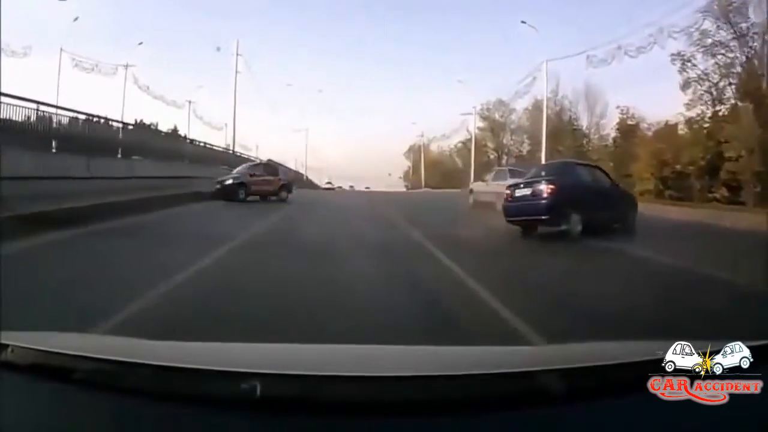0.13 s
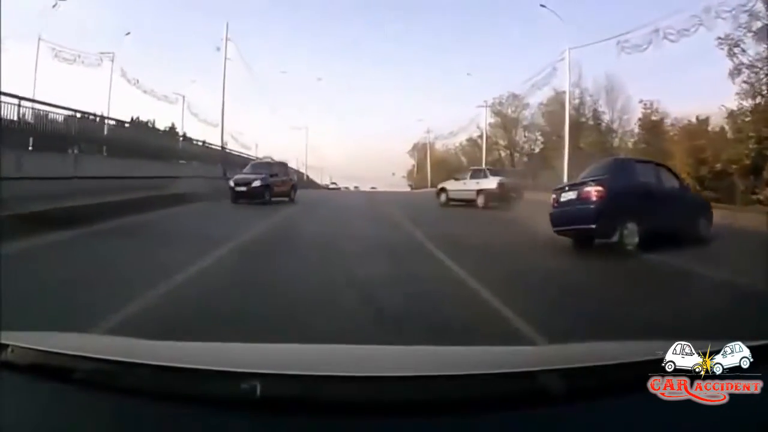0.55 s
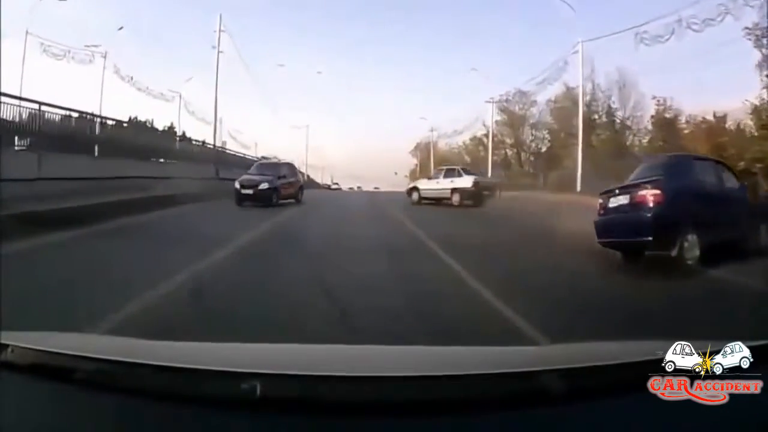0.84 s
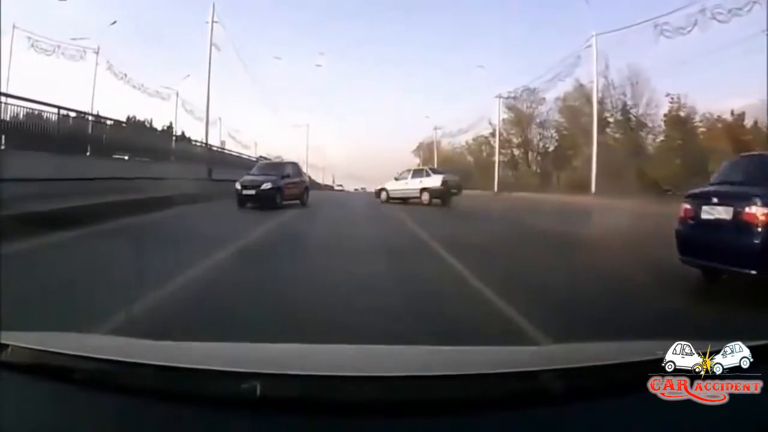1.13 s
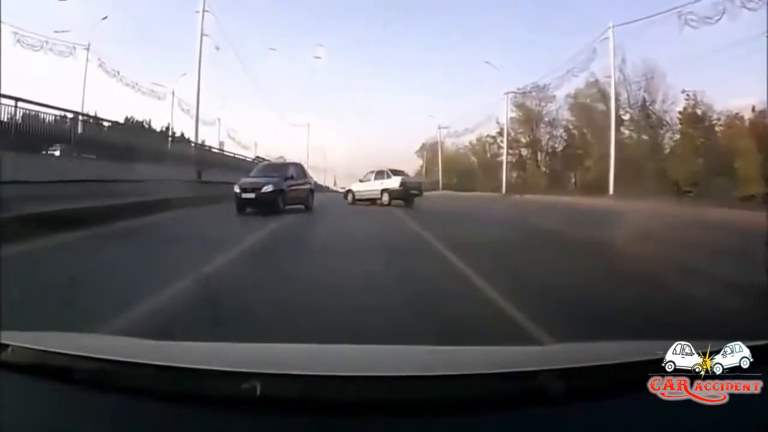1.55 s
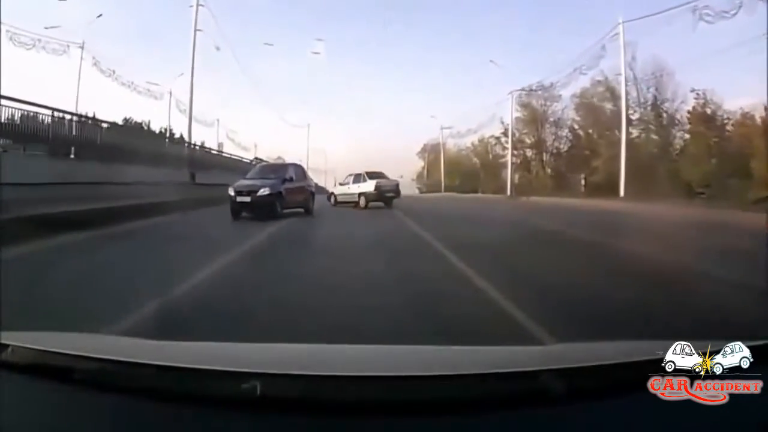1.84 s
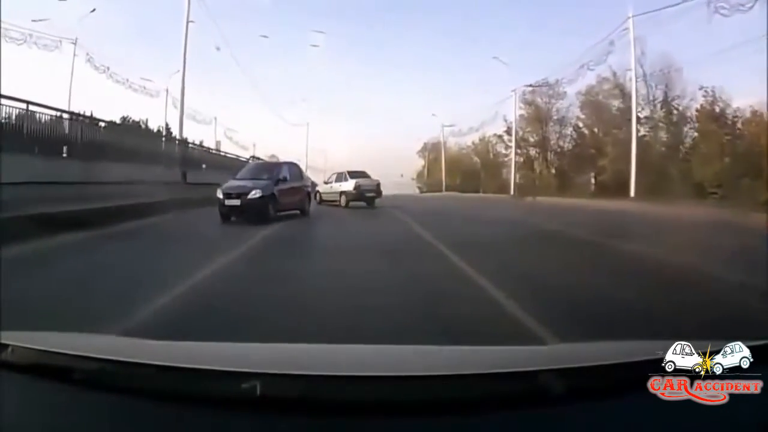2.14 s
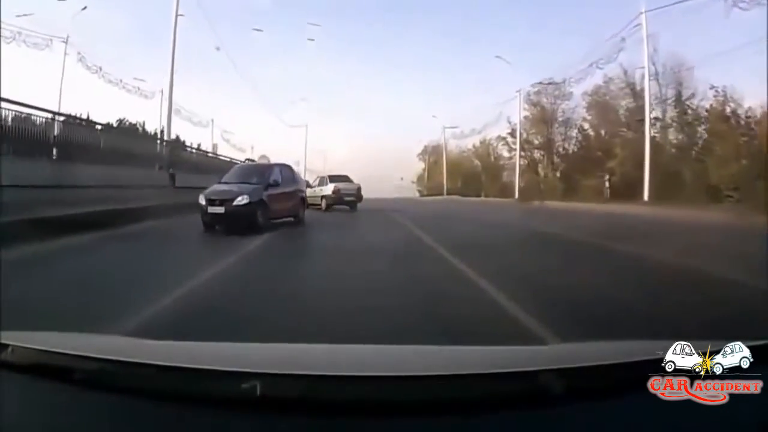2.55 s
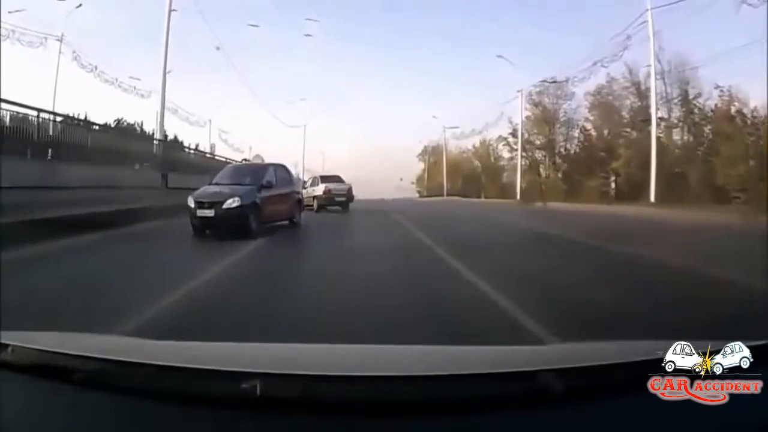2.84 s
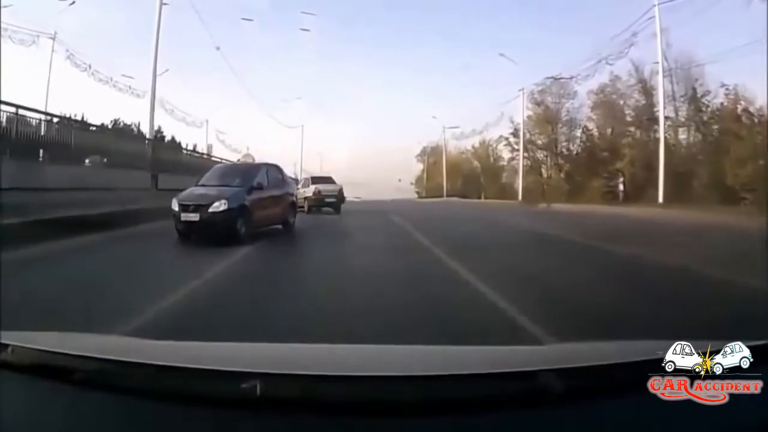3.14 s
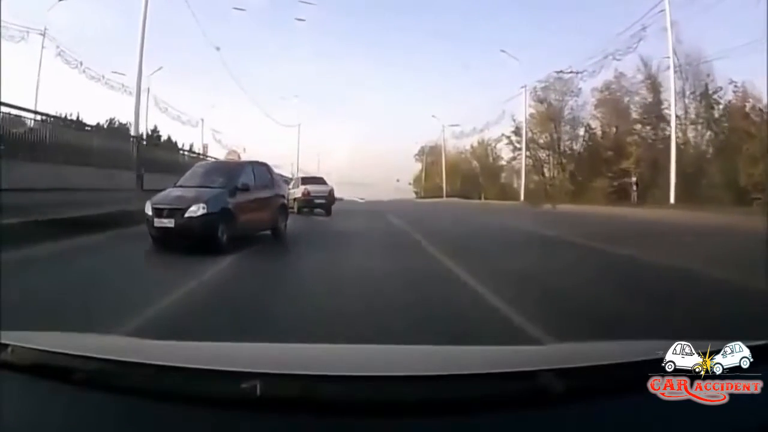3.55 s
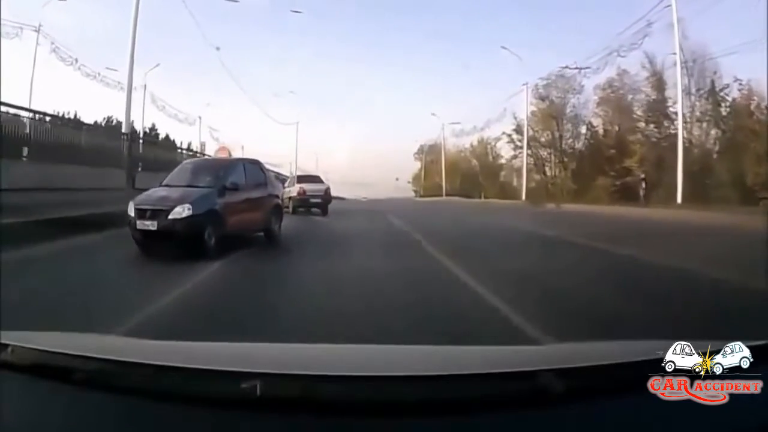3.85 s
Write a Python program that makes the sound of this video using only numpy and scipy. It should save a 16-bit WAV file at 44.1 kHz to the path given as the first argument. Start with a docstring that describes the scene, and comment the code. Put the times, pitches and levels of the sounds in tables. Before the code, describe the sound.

Tyre squeal from skidding cars, opening with a muffled metal crunch, fading into low road rumble

```python
"""Inside a braking car: tyres of skidding cars squeal, each a crowd of tread blocks that stick and slip near
one pitch, over the filtered noise of rubber scrubbing on asphalt. A dull crash of noise and ringing sheet opens
the scene; the road noise fades as the car slows. A brief brake creak of upper harmonics, the low thuds of a bump
and knocks on a ringing cabin panel come later; a cheap camera adds a faint whine of pulsing narrow noise bands."""
import sys
import numpy as np
from scipy import signal
from scipy.fft import rfft, irfft
from scipy.io import wavfile
from scipy.ndimage import uniform_filter1d

SR = 44100
rng = np.random.default_rng(int(sys.argv[2]) if len(sys.argv) > 2 else 0)


def linear_from_db(decibels):
    """Turn decibels (scalar or array-like) into linear amplitude factors; 0 gives 1."""
    return 10 ** (np.asarray(decibels, float) / 20)


def wav_record(signal):
    """Record a signal, one row per channel, as 16-bit PCM in the file named by sys.argv[1]."""
    frames = np.transpose(np.atleast_2d(signal))
    bounded = np.clip(frames, -1, 1)
    # unit amplitude maps onto the largest positive 16-bit level
    quanta = np.round(bounded * 32767).astype(np.int16)
    wavfile.write(sys.argv[1], SR, quanta)


N = 176400
T = np.arange(N) / SR
SHORT_T = T[:SR // 4]  # time axis for rings and tails
BIN_HZ = np.arange(N // 2 + 1) * SR / N


def level(x, db):
    """Scale to an rms level in dB."""
    return x * linear_from_db(db) / np.sqrt(np.mean(x ** 2))


def col(table, index):
    """Join one column of a table over time with straight lines."""
    points = np.array(table, float)
    return np.interp(T, points[:, 0], points[:, index])


def gate(table):
    """Fade in and out inside the span of a table; one that begins with the scene starts open."""
    fade_s = 0.024
    start, end = table[0][0], table[-1][0]
    since_start = T - start + fade_s * (start < fade_s)
    return np.clip(np.minimum(since_start, end - T) / fade_s, 0, 1)


def walk(rate):
    """Random steps held 1 / rate seconds and smoothed twice, with rms 1."""
    hold = max(int(SR / rate), 2)
    steps = rng.standard_normal(2000)[np.arange(N) // hold % 2000]
    slewed = uniform_filter1d(uniform_filter1d(steps, hold), hold)
    return level(slewed, 0)


def noise(colour, flicker_db, rate):
    """Coloured noise of rms 1 whose third-octave bands flicker, partly together."""
    points = np.array(colour, float)
    hz = np.maximum(BIN_HZ, 1)
    tint_db = np.interp(np.log(hz), np.log(points[:, 0]), points[:, 1], -120, -120)
    spectrum = rfft(rng.standard_normal(N)) * linear_from_db(tint_db)
    shared = walk(rate)
    band = 3 * np.log2(hz)
    lowest = int(3 * np.log2(points[1, 0])) - 1
    highest = int(3 * np.log2(points[-3, 0])) + 3
    out = np.zeros(N)
    for k in range(lowest, highest + 1):
        part = irfft(spectrum * np.clip(1 - np.abs(band - k), 0, 1), N)  # overlapping triangular bands
        out += part * linear_from_db(flicker_db * (shared / 2 + walk(rate)))
    return level(out, 0)


def ring(modes):
    """A struck body rings as a sum of decaying sine modes."""
    return sum(linear_from_db(db) * np.sin(2 * np.pi * hz * SHORT_T) * 1000. ** (-SHORT_T / t60) for hz, db, t60 in modes)


def tyre(rate, loudness, spread, second_db, third_db, count=7):
    """Groups of tread blocks slip near one rate; each wanders in rate and grips in bursts."""
    wander, wander_per_s = 0.01518, 90  # relative rms, steps per second
    grip_db, grip_per_s = 4, 70
    out = np.zeros(N)
    on = gate(loudness) > 0
    for place in np.linspace(-1, 1, count):
        detune = spread * (place + .3 * walk(25)) + wander * walk(wander_per_s)
        hz = col(rate, index=1) * (1 + detune)
        turn = 2 * np.pi * (np.cumsum(hz[on]) / SR + rng.random())
        bursts_db = grip_db * walk(grip_per_s) + 1.13 * walk(35.03)
        grip = linear_from_db(bursts_db - 2.5 * place ** 2)[on]  # groups far from the mean rate are softer
        partials = np.sin(turn) + linear_from_db(second_db) * np.sin(2 * turn) + linear_from_db(third_db) * np.sin(3 * turn)
        out[on] += grip * partials
    even = out / np.sqrt(np.mean(out[on] ** 2))
    return even * linear_from_db(col(loudness, index=1)) * gate(loudness)


def squeal():
    """Eight tyres squeal by stick-slip, each on its own path of slip rate and level."""
    # slip rate of each tyre, one path per tyre: t/s, f/Hz
    slip_rates = [
        [(0, 930), (.15, 900), (.45, 885), (.56, 950), (.72, 965), (.85, 1030), (1.08, 1055)],
        [(0, 1300), (.2, 1260), (.4, 1250), (.52, 1315), (.66, 1310), (.9, 1280)],
        [(0, 1480), (.42, 1420), (.62, 1430), (.74, 1500), (.86, 1500), (.92, 1400), (1.2, 1380), (1.45, 1330),
         (1.7, 1400), (2.1, 1400), (2.5, 1430)],
        [(1.08, 1200), (1.2, 1185), (1.38, 1260), (1.52, 1190), (1.75, 1165), (2.12, 1160)],
        [(1.3, 1110), (1.55, 1050), (1.8, 1050), (1.92, 1075), (2.0, 1055), (2.3, 1045)],
        [(1.3, 950), (1.5, 930), (1.6, 860), (1.8, 900), (2.15, 900)],
        [(0, 1000), (.1, 980), (.25, 960), (.45, 965), (.6, 990), (.83, 1010)],
        [(1.28, 1115), (1.5, 1110), (1.7, 1100), (1.9, 1095), (2.22, 1060)],
    ]
    # tread of each tyre: relative spread of the blocks' rates, 2nd partial level/dB, 3rd partial level/dB
    treads = [(.032, -12.5, -15.5), (.02, -10, -34.5), (.025, -13, -36), (.06, -12.5, -18),
              (.028, -11.5, -32), (0.024, -7, -17), (0.027, -5, -13), (.045, -2.5, -11.5)]
    # loudness path of each tyre ahead of the cabin: t/s, level/dB
    tyre_1 = [(0.09, -27), (0.098, -35.5), (0.382, -30), (0.406, -19), (0.43, -30), (0.462, -19.5),
              (0.506, -33.5), (0.544, -26), (0.654, -24.5), (0.68, -36.5), (0.72, -27), (0.786, -36.5),
              (0.88, -33), (0.952, -32), (0.976, -35), (1.032, -39.5), (1.08, -41)]
    tyre_2 = [(0.0, -40), (0.09, -25), (0.12, -44), (0.15, -28), (0.43, -46), (0.536, -26), (0.696, -42),
              (0.716, -42), (0.784, -64), (0.826, -50), (0.872, -55), (0.9, -48)]
    tyre_3 = [(0.0, -41), (0.04, -35), (0.37, -46), (0.481, -21), (0.51, -46), (0.61, -25), (0.64, -46),
              (0.74, -24), (0.77, -44.5), (0.81, -28.5), (0.86, -48), (0.95, -32.5), (1.16, -37),
              (1.18, -31), (1.59, -39), (1.61, -46), (1.68, -46), (1.71, -30), (1.73, -47), (1.79, -35.5),
              (2.04, -40), (2.13, -60), (2.32, -43.5), (2.35, -65), (2.37, -41), (2.5, -58)]
    tyre_4 = [(1.08, -49), (1.094, -49), (1.132, -29), (1.172, -34), (1.404, -25.5), (1.462, -39),
              (1.526, -23), (1.552, -36), (1.574, -26), (1.65, -31), (1.9, -29.5), (2.018, -42),
              (2.07, -33), (2.12, -42)]
    tyre_5 = [(1.299, -49), (1.43, -37.5), (1.476, -49), (1.502, -33.5), (1.648, -39), (1.708, -30),
              (1.766, -42), (1.836, -29), (1.892, -31.5), (1.96, -31), (2.046, -22.5), (2.084, -30.5),
              (2.108, -47), (2.136, -38), (2.17, -51), (2.21, -40), (2.3, -60)]
    tyre_6 = [(1.3, -65), (1.43, -34), (1.538, -62), (1.606, -27), (1.64, -48), (1.654, -36), (2.126, -48),
              (2.15, -50)]
    tyre_7 = [(0.0, -32), (0.06, -34.5), (0.098, -32.5), (0.3, -31.5), (0.442, -33), (0.5, -38),
              (0.6, -29.5), (0.68, -38.5), (0.74, -31.5), (0.83, -40)]
    tyre_8 = [(1.28, -44), (1.4, -37), (1.6, -37), (1.75, -35.5), (1.9, -32), (2.05, -30.5), (2.12, -38.5),
              (2.22, -53)]
    paths = (tyre_1, tyre_2, tyre_3, tyre_4, tyre_5, tyre_6, tyre_7, tyre_8)
    return sum(tyre(rate, path, *tread) for rate, path, tread in zip(slip_rates, paths, treads))


def cabin(x):
    """Glass and cabin colour the squeal; the street and cabin add a short diffuse tail."""
    # colour of the way in: f/Hz, level/dB
    way_in = [(700, 0.5), (1550, -1), (1700, -12.5), (1900, 1), (2300, -2), (2600, -6.5), (2900, -6),
              (3100, -12.5), (3350, -5.5), (3800, -16)]
    tail_db, tail_t60_s = -5, 0.15
    points = np.array(way_in, float)
    tail = rng.standard_normal(len(SHORT_T)) * 1000. ** (-SHORT_T / tail_t60_s)
    tail = tail / np.sqrt(np.sum(tail ** 2))
    wet = x + linear_from_db(tail_db) * signal.fftconvolve(x, tail)[:N]
    gain = linear_from_db(np.interp(BIN_HZ, points[:, 0], points[:, 1]))
    return irfft(rfft(wet) * gain, N) / np.sqrt(1 + linear_from_db(2 * tail_db))


def scrub():
    """Sliding rubber makes broad friction noise; a faint high hiss follows the slide."""
    # loudness path shared by rubber and hiss, ahead of their own gains: t/s, level/dB
    slide = [(0.0, -44), (0.01, -46.5), (0.06, -37), (0.11, -41), (0.46, -44), (0.5, -45.5), (0.51, -43.5),
             (0.59, -47.5), (0.62, -45), (0.63, -45), (0.82, -46), (0.9, -52), (1.05, -49), (1.06, -57),
             (1.19, -48), (2.01, -51.5), (2.12, -55.5), (2.37, -61.5), (2.42, -58.5), (2.49, -67.5),
             (2.6, -70)]
    # colour of the rubber noise: f/Hz, relative level per Hz/dB
    rubber_colour = [(150, -53), (250, -28), (310, -10.5), (439, -24), (593, -18.5), (702, -16), (881, -8),
                     (1070, -1.5), (1390, -0.5), (1730, -12.5), (2070, -11), (2500, -22), (3380, -20.5),
                     (3720, -30.5), (4400, -31), (5720, -63), (9680, -120)]
    # colour of the faint high hiss: f/Hz, relative level per Hz/dB
    hiss_colour = [(3000, -61), (4000, 3.5), (6000, -1), (8000, -9.5), (9500, -6), (11000, 0), (12000, -26),
                   (20000, -120)]
    rubber_db, hiss_db = 14.5, -14.5
    rubber = noise(rubber_colour, 2.9, 39.8) * linear_from_db(rubber_db)
    hiss = noise(hiss_colour, 1.7, 40.4) * linear_from_db(hiss_db)
    return (rubber + hiss) * linear_from_db(col(slide, index=1)) * gate(slide)


def crash():
    """A short crunch of sheet metal with a few ringing blows, muffled by the glass."""
    # loudness path of the crunch: t/s, level/dB
    crunch_path = [(.012, -41), (.035, -24.5), (.052, -20.5), (.062, -25.5), (.076, -22), (.088, -23),
                   (.1, -25.5), (.14, -41)]
    # colour of the crunch: f/Hz, relative level per Hz/dB
    crunch_colour = [(35, -43), (60, -4), (90, -21), (150, -12), (327, -11.5), (552, -12), (717, -10),
                     (1060, -6.5), (1250, -22), (1570, -38), (1950, -27), (2530, -33), (3740, -29.5),
                     (4970, -55), (10900, -66), (14100, -67), (22000, -120)]
    # main blows: t/s, level/dB
    blows = [(0.0573, -9), (.069, -13), (0.0866, -29)]
    # modes of the struck sheet: f/Hz, relative level/dB, t60/s
    sheet_modes = [(145, -14.5, 0.27), (532, -12, 0.08), (960, -20, 0.051), (1063, 2, 0.075),
                   (1286, -21, 0.067), (1450, -10, 0.043)]
    rise_s = 0.0011
    out = noise(crunch_colour, 2.5, 112) * linear_from_db(col(crunch_path, index=1)) * gate(crunch_path)
    sheet = ring(sheet_modes) * (1 - np.exp(-SHORT_T / rise_s))
    for s, db in blows:
        start = int(s * SR)
        out[start:start + len(sheet)] += linear_from_db(db) * sheet
    return out


def bumps():
    """The car rocks over a bump: the body rings in low thuds through the suspension."""
    # thuds: t/s, level/dB
    thuds = [(2.735, -33), (2.804, -19), (2.871, -27)]
    body_hz, t60_s, rise_s = 63.7, 0.18, 0.01
    thud = ring([(body_hz, 0, t60_s)]) * (1 - np.exp(-SHORT_T / rise_s))
    out = np.zeros(N)
    for s, db in thuds:
        start = int(s * SR)
        out[start:start + len(thud)] += linear_from_db(db) * thud
    return out


def knocks():
    """Soft pushes ring a cabin panel, with a short crack of noise at each contact."""
    # pushes: t/s, relative level/dB, contact time/ms, direction (1 or -1)
    pushes = [(3.2434, -28, 0.99, 1), (3.2488, -26.5, 0.33, -1), (3.3635, -36, 0.99, 1),
              (3.371, -35.5, 0.66, -1)]
    # modes of the panel: f/Hz, relative level/dB, t60/s
    panel_modes = [(97, -4, 0.042), (142, -5, .04), (255, -2, 0.041), (412, 7, 0.065), (504, -1.5, 0.055),
                   (620, -17, 0.071), (780, -9, 0.037), (1039, -23, .03), (2153, -27, .03)]
    # colour of the crack: f/Hz, relative level per Hz/dB
    crack_colour = [(200, -40), (500, -6), (1000, 4), (2000, -5), (3000, -17), (4500, -31), (8000, -50),
                    (12000, -120)]
    crack_db, crack_decay_s = -15.5, 0.006
    push = np.zeros(N)
    for s, db, ms, way in pushes:
        push += np.sign(way) * linear_from_db(db) * np.exp(-((T - s) * 2000 / ms) ** 2) / ms  # bell-shaped force
    crack_shape = signal.fftconvolve(np.abs(push), np.exp(-SHORT_T / crack_decay_s))[:N]
    crack = crack_shape * noise(crack_colour, 1.8, 93)
    panel = signal.fftconvolve(push, ring(panel_modes))[:N]
    return (panel + linear_from_db(crack_db) * crack) * 1000 / SR


def creak():
    """A brake pad slips for a moment: upper harmonics of an unsteady slip rate."""
    # harmonics of the slip rate: harmonic number, relative level/dB
    harmonics = [(4, 4), (5, 7), (6, 5), (7, 0), (8, -1)]
    start_s, length_s, slip_hz, creak_db = 2.4, 0.06, 430, -52
    turn = 2 * np.pi * np.cumsum(slip_hz * (1 + 0.0274 * walk(200))) / SR
    shape = np.sin(np.pi * np.clip((T - start_s) / length_s, 0, 1)) ** .5
    tone = sum(linear_from_db(db + 2.5 * walk(120)) * np.sin(int(k) * turn + k * k) for k, db in harmonics)
    return shape * linear_from_db(creak_db) * tone


def road():
    """Body rumble, a cabin boom, tyre roar and a hiss that sinks as the car slows."""
    # loudness paths: t/s, rumble level/dB, boom level/dB, roar level/dB
    road_path = [(0.0, -37, -37.5, -35.5), (0.48, -27, -32, -38.5), (0.8, -33, -40.5, -40),
                 (0.93, -30.5, -43, -40), (1.29, -34.5, -36.5, -42), (1.55, -35, -39.5, -44),
                 (1.69, -33.5, -41, -44), (1.9, -36, -39, -45.5), (2.12, -38, -36, -48.5),
                 (2.35, -35.5, -38, -47.5), (2.65, -43, -36.5, -51), (2.85, -36.5, -40, -48),
                 (3.02, -41, -47.5, -51), (3.31, -38.5, -42, -43.5), (3.71, -36.5, -45.5, -50),
                 (3.89, -36.5, -51.5, -48), (4.0, -39, -54, -51.5)]
    # colour of the body rumble: f/Hz, relative level per Hz/dB
    rumble_colour = [(8.8, -40), (15, -7), (43, 2.5), (61, -2.5), (97, -7), (110, -13), (140, -46),
                     (240, -120)]
    # colour of the cabin boom: f/Hz, relative level per Hz/dB
    boom_colour = [(62, -28), (105, -7), (140, 2), (185, -12), (240, -26.5), (410, -120)]
    # colour of the tyre roar: f/Hz, relative level per Hz/dB
    roar_colour = [(110, -34), (180, -3), (205, 0.5), (249, -11), (307, -5.5), (449, -25.5), (539, -12.5),
                   (700, -25), (910, -41), (1540, -120)]
    # colour of the hiss: f/Hz, relative level per Hz/dB
    hiss_colour = [(210, -24), (350, -8), (416, -5), (531, -8), (631, -7.5), (1030, 3), (1140, -2.5),
                   (1450, -0.5), (1650, -7.5), (2050, -6.5), (2730, -23.5), (3390, -23.5), (3970, -32),
                   (5940, -33), (6480, -34.5), (7370, -31.5), (8040, -31), (8640, -30), (9410, -32.5),
                   (10400, -29.5), (10900, -26), (14100, -62), (22000, -120)]
    hiss_start_db, hiss_fall_db_per_s = -44.5, 0.84
    out = noise(hiss_colour, 2.15, 14) * linear_from_db(hiss_start_db - hiss_fall_db_per_s * T)
    for k, colour in enumerate((rumble_colour, boom_colour, roar_colour)):
        out += noise(colour, 1.23, 7.4) * linear_from_db(col(road_path, index=k + 1))
    return out


def whine():
    """Narrow hiss bands from the camera's circuits, swelling once a picture."""
    # hiss bands: middle f/Hz, half-width f/Hz, level ahead of the swelling/dB
    whine_bands = [(7000, 200, -81.5), (7620, 150, -80), (8680, 380, -79.5), (10200, 300, -80),
                   (10740, 210, -76)]
    picture_hz, depth = 29.27, .8
    out = np.zeros(N)
    for mid_hz, width_hz, db in whine_bands:
        bell = np.exp(-((BIN_HZ - mid_hz) / width_hz) ** 2)
        out += level(irfft(rfft(rng.standard_normal(N)) * bell, N), db)
    return out * (1 + depth * np.cos(2 * np.pi * picture_hz * T))


def uneven_clock(x):
    """Periodic sampling-time errors mirror the sound beside the clock rate and its double."""
    clock_hz, clock_us, double_us = 3892.5, 5.56, 3.07
    turn = 2 * np.pi * clock_hz * T
    late_s = (clock_us * np.cos(turn) + double_us * np.cos(2 * turn)) / 1e6
    return x + late_s * np.gradient(x, axis=1) * SR  # small time shift as slope times time


def scene():
    """All sources meet at one microphone."""
    return (cabin(squeal()) + scrub() + crash() + bumps() + knocks() + creak() + road())[None]


def band_limit(x):
    """A steep low-pass at the top of the band."""
    return signal.sosfilt(signal.butter(12, 11020, fs=SR, output="sos"), x)


def record(dry):
    """The camera samples unevenly, adds its whine and cuts the top with a steep low-pass."""
    top_hz = 10850
    x = uneven_clock(dry) + whine()
    low_pass = signal.ellip(16, .2, 32, top_hz, fs=SR, output="sos")  # order, ripple dB, stop-band dB
    mix = signal.sosfilt(low_pass, x)
    return band_limit(mix)


dry = scene()
out = record(dry)
wav_record(out)
```